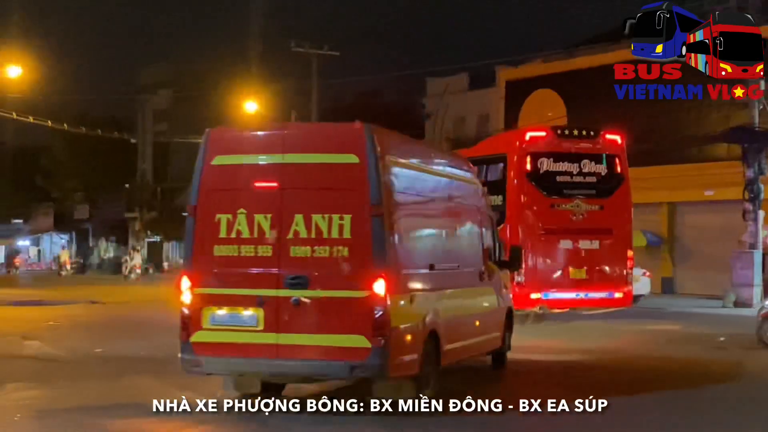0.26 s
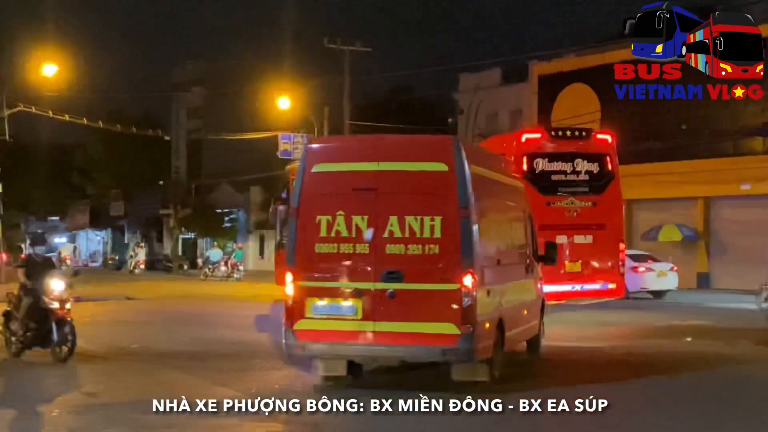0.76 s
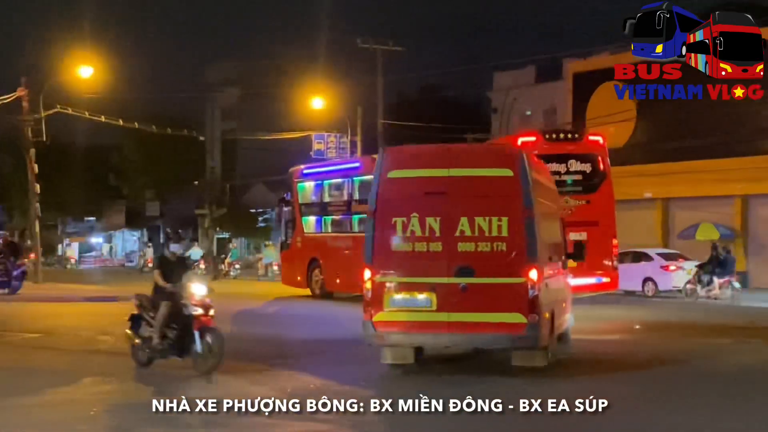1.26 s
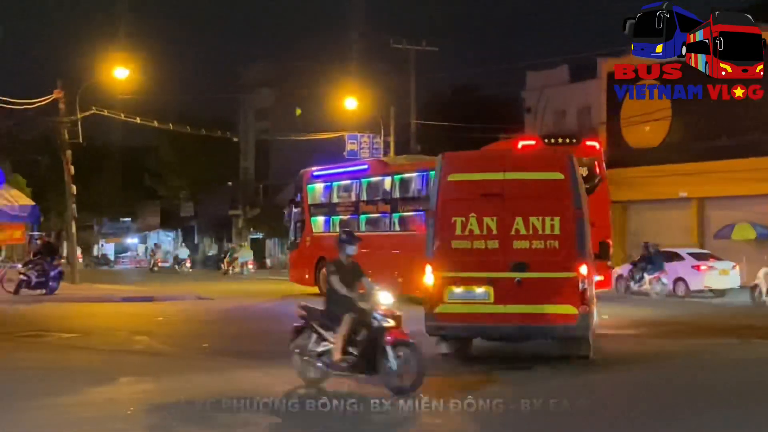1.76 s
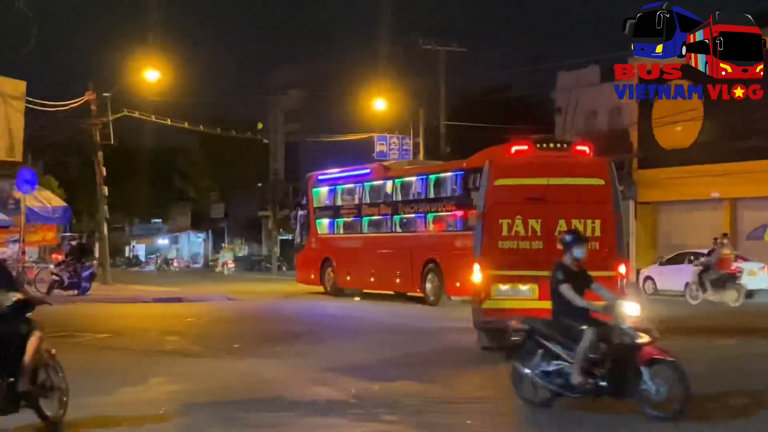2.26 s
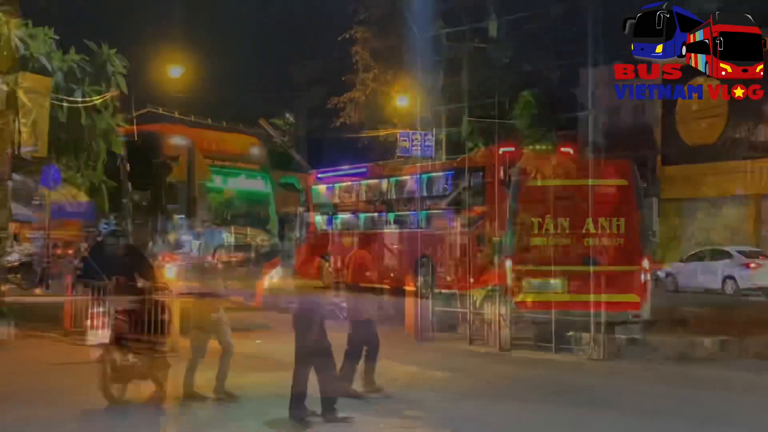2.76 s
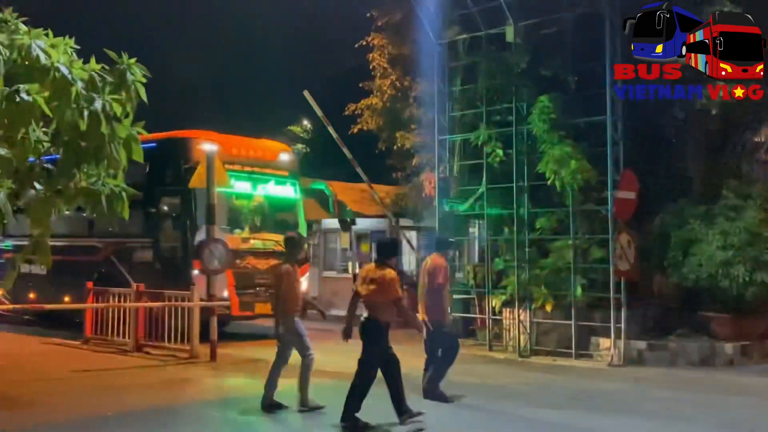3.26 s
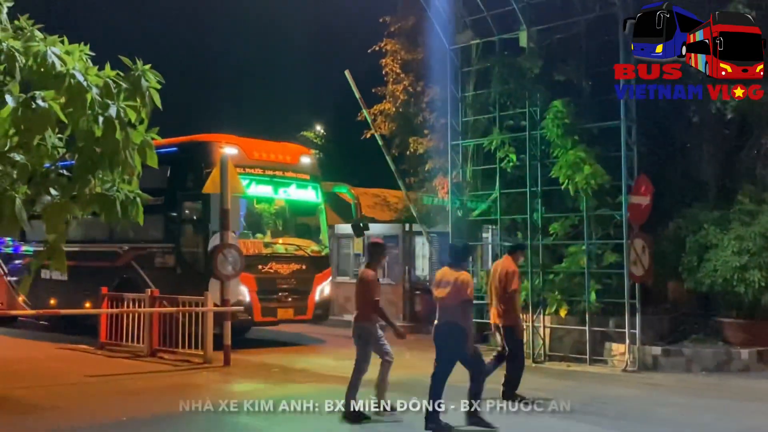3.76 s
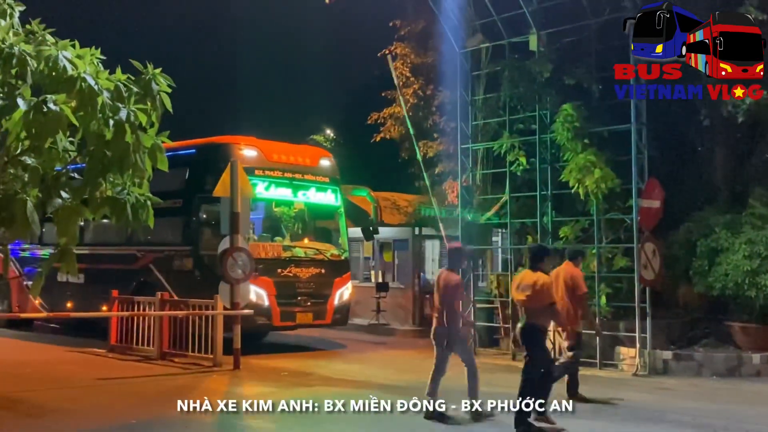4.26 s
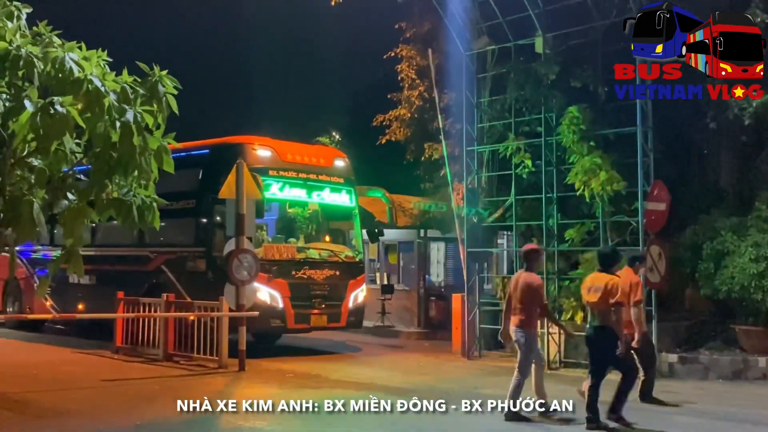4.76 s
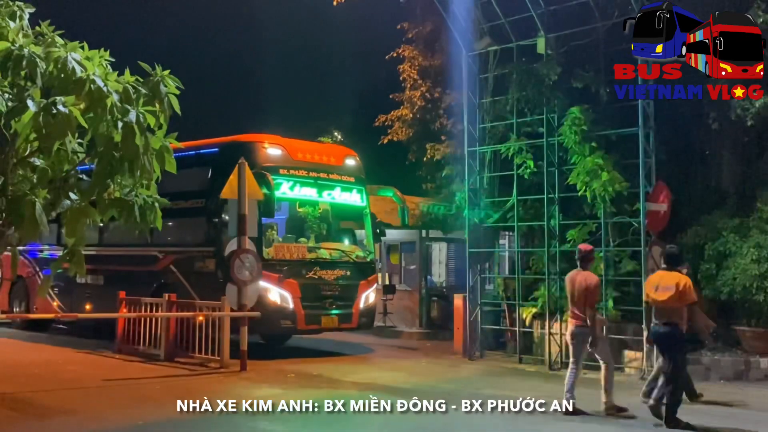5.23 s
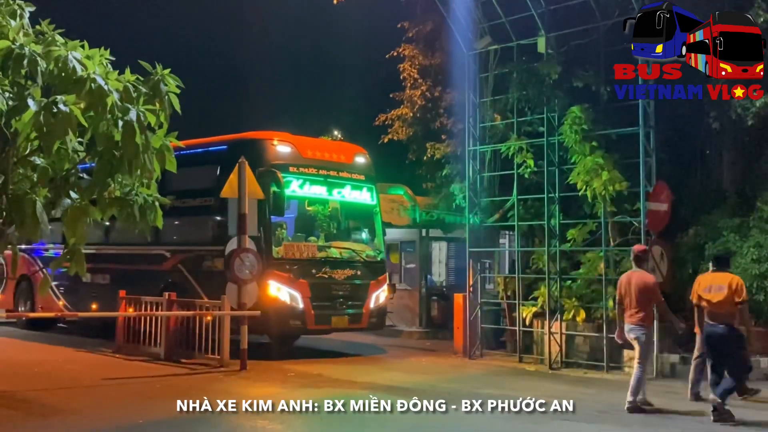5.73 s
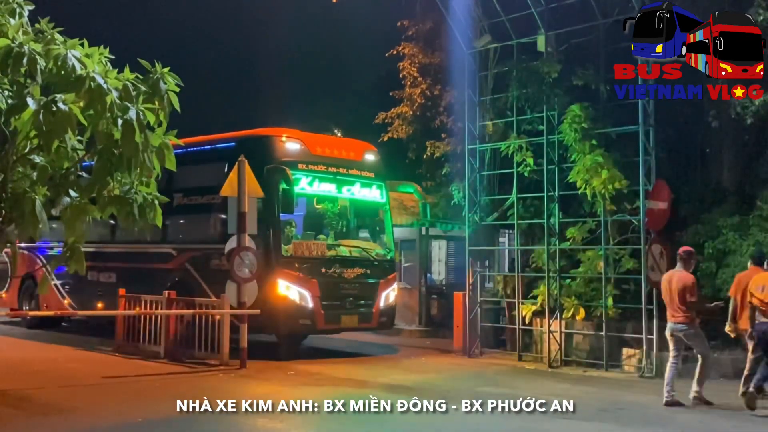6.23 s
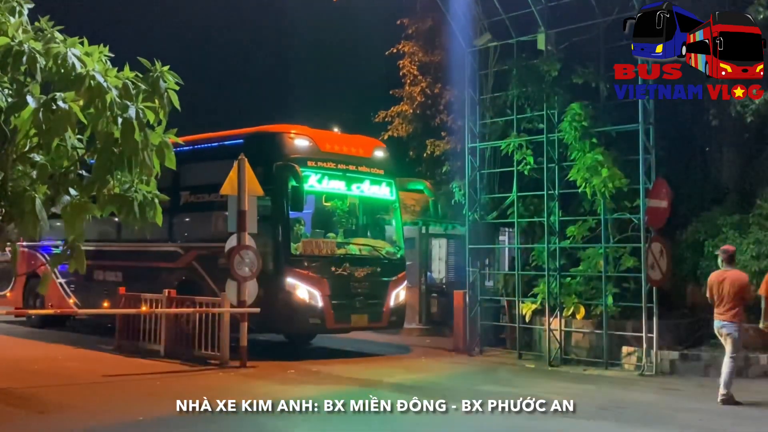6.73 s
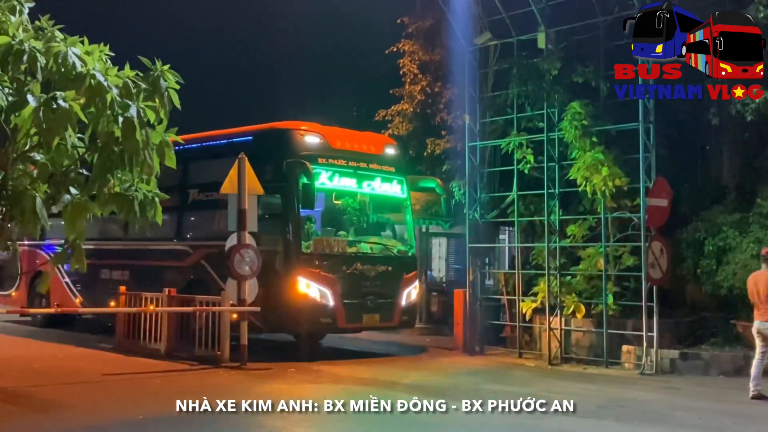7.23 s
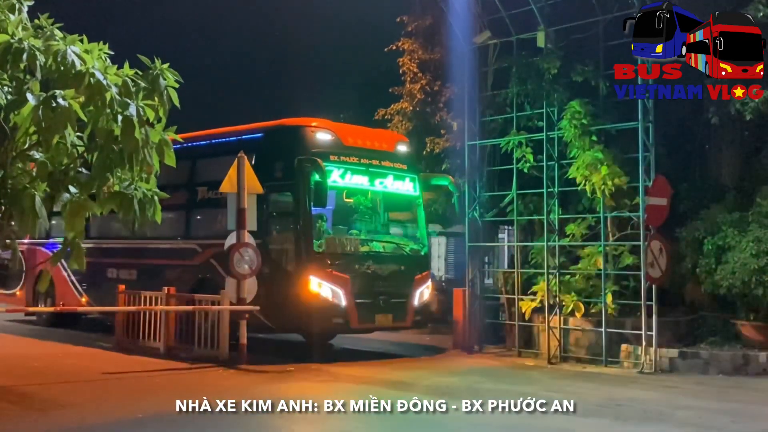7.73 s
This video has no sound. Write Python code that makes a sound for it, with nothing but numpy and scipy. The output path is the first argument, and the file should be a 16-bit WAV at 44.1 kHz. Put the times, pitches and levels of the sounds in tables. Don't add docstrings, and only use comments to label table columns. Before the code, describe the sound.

A night street by a bus station, heard through a phone's stereo microphones. From 0 to 2.4 seconds, a van, coach and motorbikes pull away: thick low diesel rumble, wavering exhaust hums, tyre roar, light valve clatter and airy hiss, with faint gear whines and brief belt squeaks. A small throttle lift comes near 1.2, and tiny sharp brake-air spits at about 1.8, 2.0 and 2.35. Between 2.4 and 3.3 the sound crossfades to the station gate, with a soft air leak around 3.2. A coach idles there, bass throbbing irregularly, the treble duller and quieter. A very faint wavering far beep passes around 5.3 to 5.5. From 7.1, distant horns give two quick, thin, high buzzing presses, the second near 7.4 and strongest around 7.5, then a slightly lower faint tone and blurred echoes linger until 8 as the engine continues.

```python
import sys
import numpy as np
from scipy import signal
from scipy.fft import rfft, irfft, next_fast_len
from scipy.io import wavfile
from scipy.ndimage import uniform_filter1d, map_coordinates

SR = 44100
rng = np.random.default_rng(int(sys.argv[2]) if len(sys.argv) > 2 else 0)


def ratio_of_db(decibels):
    return 10 ** (np.asarray(decibels, float) / 20)


def digitize_waveform(pressure):
    field = np.atleast_2d(pressure).T
    bounded = np.clip(field, -1, 1)
    quanta = np.round(bounded * 32767).astype(np.int16)
    wavfile.write(sys.argv[1], SR, quanta)


N = 352359

POINTED = np.array([[1.25], [.4]])


def seconds():
    return np.arange(N) / SR


def unit(x):
    return x / np.sqrt(np.mean(x ** 2) + 1e-20)


def along(points, hz):
    f, v = np.transpose(points)
    return np.interp(np.log(hz + 1), np.log(f + 1), v)


def curves(rows):
    s, *columns = np.transpose(rows)
    return [np.interp(seconds(), s, column) for column in columns]


def wobble(rate):
    knots = rng.standard_normal(int(N * rate / SR) + 4)
    return map_coordinates(knots, [np.arange(N) * rate / SR])


def filtered(x, response):
    m = next_fast_len(N + 8192)
    return irfft(rfft(x, m) * response(np.fft.rfftfreq(m, 1 / SR)), m)[..., :N]


def swells(rows):
    t = seconds()
    lift = np.zeros(N)
    for s, db, rise, fall in rows:
        before = np.clip(1 + (t - s) / rise, 0, 1)
        after = np.exp(-np.abs(t - s) / fall)
        lift += db * np.where(t < s, before, after)
    return lift


def tone(hz, db, drift, flutter_db, rate):
    turns = np.cumsum(hz * np.ones(N)) / SR
    pair = []
    for _ in range(2):
        size = np.sqrt(2) * ratio_of_db(db + flutter_db * wobble(rate))
        pair.append(size * np.sin(2 * np.pi * (turns + drift * wobble(rate))))
    return np.array(pair)


def held(notes, edge, drift, flutter_db, rate):
    out = np.zeros((2, N))
    for start, end, hz, end_hz, db in notes:
        a, b = max(int(start * SR), 0), min(int(end * SR), N)
        t = np.arange(b - a) / SR
        where = np.broadcast_arrays(np.arange(4)[:, None], 3 + t * rate)
        rough = map_coordinates(rng.standard_normal((4, 40)), where)
        glide = hz * t + (end_hz - hz) * t ** 2 / (2 * (end - start))
        turns = glide + drift * rough[:2] + rng.random((2, 1))
        soft = np.clip(np.minimum(t + (start <= 0), t[::-1]) / edge, 0, 1)
        size = np.sqrt(2) * soft * ratio_of_db(db + flutter_db * rough[2:])
        out[:, a:b] += size * np.sin(2 * np.pi * turns)
    return out


FADE_S = (2.41, 3.29)


def at_gate():
    return np.interp(seconds(), FADE_S, [0, 1])


# time in seconds, firing rate in Hz, level in dB.
NEAREST_DIESEL = [(0, 59.4, -22.5), (.62, 59.3, -28), (.8, 65.3, -25.5), (1.55, 64.15, -20.5),
                  (1.75, 59.4, -24.5), (2.38, 60.4, -26), (2.7, 64.2, -27), (3.36, 61.85, -37),
                  (4, 60.7, -28), (4.5, 66.04, -24), (4.8, 59.9, -33), (5.2, 60.3, -21.5), (5.5, 65.1, -25),
                  (5.9, 67.5, -25.5), (6.25, 60.46, -27), (6.7, 64.63, -21), (7.3, 66, -33),
                  (7.99, 62.2, -26.5)]
# start in seconds, end in seconds, start in Hz, end in Hz, level in dB.
EXHAUST_NOTES = [(0.0, 0.41, 161.8, 161, -34), (0.0, 0.47, 317.3, 311, -49),
                 (0.0, 0.77, 192.6, 199.4, -29.5), (0.05, 0.39, 256.5, 265.6, -41),
                 (0.33, 0.67, 114.2, 120, -35), (0.75, 1.27, 98.8, 98.4, -24),
                 (0.47, 0.79, 229.4, 231, -36), (0.57, 1.03, 317.2, 314, -37.5),
                 (0.59, 0.93, 262, 258.5, -35), (1.03, 1.35, 263.3, 249, -35),
                 (1.05, 1.33, 127, 137.4, -26.5), (1.05, 1.83, 114.4, 119.3, -27.5),
                 (1.23, 1.63, 97.5, 100, -26), (1.31, 1.63, 131.4, 130, -32),
                 (1.31, 1.65, 164.2, 162.2, -30.5), (1.55, 2.07, 143.6, 142.1, -27),
                 (1.86, 2.3, 125, 119.8, -27.5), (2.01, 2.35, 203.7, 207.6, -34),
                 (2.05, 2.49, 217.3, 214, -35), (2.27, 2.91, 96.9, 95.4, -29),
                 (2.29, 2.67, 284.2, 291, -38),
                 (2.73, 3.034, 201.3, 201.8, -35), (2.792, 3.09, 64, 61.0, -29),
                 (2.992, 3.41, 65.6, 58.5, -31), (3.174, 3.488, 299, 306, -41),
                 (3.33, 3.689, 65.7, 60.9, -31), (3.351, 3.65, 267, 269, -38.5),
                 (3.51, 4.17, 176.3, 176.5, -32), (3.871, 4.19, 72.3, 73.6, -34),
                 (3.872, 4.33, 57.5, 62.55, -32), (3.931, 4.493, 220.3, 214.6, -35.5),
                 (3.949, 4.25, 85.4, 88.6, -32), (4.055, 4.37, 290, 288, -45),
                 (4.588, 4.89, 315, 321.5, -46.5), (4.649, 4.973, 89.3, 90.8, -31),
                 (4.729, 5.05, 200, 201, -34.5), (5.27, 5.615, 163.7, 164.4, -34),
                 (5.63, 5.97, 169.2, 168, -39), (5.688, 6.01, 72.6, 73.8, -28),
                 (5.81, 6.171, 97, 101.3, -30), (5.887, 6.21, 147.6, 144, -41),
                 (5.93, 6.25, 153.5, 160.6, -37), (6.386, 6.688, 259.7, 260, -39),
                 (6.47, 6.809, 206.2, 195, -35.5), (6.511, 6.89, 240.4, 248, -39),
                 (7.009, 7.35, 100.5, 95.9, -30), (7.109, 7.91, 83.65, 81.6, -27.5),
                 (7.31, 7.62, 175.8, 170.6, -34.5), (7.307, 7.63, 220.8, 227, -39),
                 (7.471, 7.77, 296, 295, -46), (7.49, 7.911, 144.3, 155.4, -39),
                 (7.51, 7.81, 317, 312, -48), (7.613, 7.992, 42.8, 43.4, -28),
                 (0.2, .85, 130, 138, -26.5), (3, 3.6, 82, 92, -26), (3.05, 3.5, 150, 175, -29),
                     (2.5, 2.75, 138, 148, -28.5), (5, 5.6, 78, 75.7, -28), (0, .3, 100, 104, -30),
                     (1.2, 1.6, 305, 320, -31.5), (1.35, 1.55, 235, 230, -31), (6.5, 6.62, 76, 108, -27.5),
                     (1.98, 2.15, 335, 340, -32), (4.5, 4.5, 370, 380, -37)]
WHINES = [(0, .35, 830, 850, -47), (1.47, 1.72, 850, 890, -40), (2, 2.3, 940, 910, -42),
          (3.38, 3.56, 875, 858, -39), (3.05, 3.35, 1565, 1520, -42), (3.95, 4.35, 1500, 1530, -44.5),
          (4.6, 4.72, 1250, 1300, -49), (4.97, 5.09, 1350, 1340, -43), (5.3, 5.5, 1100, 1170, -44),
          (5.98, 6.12, 1060, 1080, -46.5), (6.75, 6.92, 1420, 1420, -44), (5.42, 5.62, 700, 690, -43),
          (3.7, 3.82, 1450, 1440, -42), (3.44, 3.56, 1290, 1290, -42), (5.62, 5.7, 1100, 1060, -46),
          (1.3, 1.42, 1950, 2100, -48)]
SQUEAKS = [(4.02, 4.12, 1040, 1200, -49), (5.02, 5.1, 1580, 1400, -45), (3.3, 3.44, 1745, 1735, -51),
           (4.58, 4.67, 1770, 1760, -49), (4.78, 4.86, 1450, 1480, -47), (4.91, 4.96, 1250, 1020, -44),
           (5.2, 5.27, 1500, 1600, -47), (5.04, 5.08, 1150, 1100, -46), (.45, .54, 1580, 1480, -45),
           (1.22, 1.27, 1480, 1450, -44), (1.45, 1.55, 2400, 2200, -46), (2.19, 2.27, 2400, 2140, -48),
           (.12, .22, 2200, 2100, -46), (.52, .63, 2050, 1960, -47), (1.75, 1.83, 2220, 2250, -47),
           (5.12, 5.17, 1850, 2600, -46.5), (6.5, 5.34, 1560, 1600, -45), (5.47, 5.52, 2100, 1600, -46),
           (5.63, 5.73, 1240, 1260, -49.5), (4.9, 5, 2300, 1800, -55), (5.34, 5.42, 1130, 920, -44),
           (5.49, 5.52, 1700, 2000, -46), (4.66, 4.72, 1700, 1660, -52), (4.54, 4.63, 1260, 1220, -43.5),
           (3.63, 3.73, 706, 706, -43.5), (2.14, 2.24, 780, 1100, -44), (6.2, 6.9, 1340, 1336, -51),
           (7.67, 7.77, 1441, 1000, -46), (7.2, 7.3, 960, 948, -51), (2.32, 2.4, 2250, 2200, -50),
           (.05, 0.143, 624, 620, -42)]


def engines():
    idle = ratio_of_db(-2.5) * tone(*curves(NEAREST_DIESEL), drift=.2, flutter_db=2.5, rate=20)
    exhaust_rows = EXHAUST_NOTES
    exhausts = ratio_of_db(-1.5) * held(exhaust_rows, .08, drift=.15, flutter_db=3.5, rate=22)
    whines = held(WHINES, .05, drift=.17, flutter_db=2.5, rate=35)
    squeaks = ratio_of_db(2.5) * POINTED * held(SQUEAKS, .02, drift=.08, flutter_db=1.8, rate=40)
    return idle + exhausts + whines + squeaks


def rush(junction, gate, patchy_db):
    z = signal.stft(rng.standard_normal((2, N)), nperseg=512)[2]
    patches = uniform_filter1d(rng.standard_normal(z.shape[1:]), size=6, axis=0)
    patches = unit(uniform_filter1d(patches, size=14, axis=1))
    pair = signal.istft(z * ratio_of_db(patchy_db * patches), nperseg=512)[1][:, :N]
    here = unit(filtered(pair, lambda hz: ratio_of_db(along(junction, hz))))
    there = unit(filtered(pair, lambda hz: ratio_of_db(along(gate, hz))))
    return here + at_gate() * (there - here)


# frequency in Hz, level in dB per Hz.
RUMBLE_COLOURS = [
    [(13, -60), (22, -33), (35, -8), (54, -1.5), (141, 1.5), (285, -9.5), (318, -6.5), (400, -11), (520, -17), (880, -120)],
    [(13, -60), (22, -17), (44, -8.5), (65, 1.5), (123, -5.5), (161, -6), (306, -17), (400, -18.5), (520, -58), (880, -120)],
]
ROAR_COLOURS = [
    [(150, -12.5), (250, -3.5), (323, -8), (519, -11), (625, -9), (744, -14), (906, -10.5), (1200, -17), (1470, -16), (2090, -16.5), (4000, -26.5), (5200, -55), (8800, -120)],
    [(150, -39), (250, -7), (362, -1), (393, -4), (421, -3), (531, -3.5), (625, -10.5), (718, -8), (798, -10.5), (1510, -11), (1680, -15), (2370, -18.5), (4000, -28), (5200, -36.5), (8800, -120)],
]
CLATTER_COLOUR = [(2500, -8), (3500, -5), (5000, 0), (7000, -4.5), (8000, -6), (9200, -24)]
AIR_COLOURS = [
    [(6500, -30), (8000, -2), (9500, 0), (11000, -3), (13300, -8.5), (14200, -11.5), (15500, -12), (15800, -40), (15950, -120)],
    [(6500, -30), (8000, -1), (9500, 0), (11000, -2.5), (12800, -8.5), (13500, -9), (14400, -9.5), (14800, -13), (15600, -12.5), (15800, -40), (15950, -120)],
]
# time in seconds, closeness in dB.
CLOSENESS = [(0, 1), (.04, 0.5), (.6, -.5), (1.3, 0), (1.9, 0), (2.45, -1), (2.6, -1.5), (3.0, -1.5),
             (3.27, 1.5), (3.7, 1.1), (4.15, 0), (4.6, -0.05), (5.4, 0.4), (6.0, -0.3), (6.6, -1),
             (7.4, -0.94), (7.96, 0), (7.99, 2)]
# junction in dB, gate in dB, growth in dB per dB of closeness.
LAYERS = [
    (-17.5, -20, 1),
    (-28, -30.5, 1.42),
    (-46.5, -53, 1.2),
    (-56.5, -62.5, 1.4),
]
# time in seconds, lift in dB, rise in seconds, fall in
# seconds.
THROTTLE_BLIPS = [(1.2, 3.5, 0.011, 0.32), (2.1, 2.5, 0.041, 0.1), (7.1, 2.5, 0.0097, 0.037),
                  (2.62, 2, .2, .25), (2.43, -1.5, .04, .04)]
# time in seconds, lift in dB,
# rise in seconds, fall in seconds.
AIR_LEAKS = [(2.12, 3, .04, .08), (2.46, 5, 0.058, .04), (3.15, 5, .05, .25), (3.45, 2, 0.049, 0.055),
             (4.55, 4, 0.038, 0.08), (7.21, 4.5, 0.059, .04), (7.5, -2, .04, 0.039)]


def traffic():
    near_db, = curves(CLOSENESS)
    levels = [here + at_gate() * (there - here) + grows * near_db for here, there, grows in LAYERS]
    rumble_db, roar_db, clatter_db, air_db = levels
    blips_db = swells(THROTTLE_BLIPS)
    turns = np.cumsum(curves(NEAREST_DIESEL)[0]) / SR
    beat = np.cos(2 * np.pi * turns) + 0.9 * np.cos(np.pi * turns)
    rumble = ratio_of_db(rumble_db - 4.0) * rush(*RUMBLE_COLOURS, patchy_db=-1.03)
    roar = ratio_of_db(roar_db + 0.27 * beat) * rush(*ROAR_COLOURS, patchy_db=0.68)
    clatter_db = clatter_db + blips_db + 3 + 0.75 * beat + 0.38 * wobble(25)
    clatter = ratio_of_db(clatter_db) * rush(CLATTER_COLOUR, CLATTER_COLOUR, patchy_db=1.0)
    air_db = air_db + 0.8 * blips_db + swells(AIR_LEAKS) + 7 + 0.49 * beat + 0.56 * wobble(30)
    air = ratio_of_db(air_db) * rush(*AIR_COLOURS, patchy_db=0.5)
    return rumble + roar + clatter + air


# time in seconds, change in dB.
THROBS = [(.089, 1.5), (.3, -4), (.471, 2), (.56, -2), (.958, 1.5), (1.504, 1.5), (1.81, -4.5), (1.921, 3),
          (2.102, 1.5), (2.32, -2), (2.425, 3), (3.06, -3.5), (3.294, 2.5), (3.37, 2.5), (3.49, 1.5),
          (4.003, 2.5), (4.439, 2.5), (4.581, 3.5), (4.866, 1.5), (4.95, -3.5), (5.119, 2), (5.43, -2.5),
          (5.655, 2), (5.749, 1.5), (5.926, 2), (6.143, 3), (6.23, -3), (6.34, -3.5), (6.42, 3), (6.664, 2),
          (7.117, 2), (7.271, 1.5), (7.417, 2), (7.71, 2), (7.842, 2)]


def throbbing(pair):
    t = seconds()
    bass_top_hz, half_width_s, steady = 190, .035, .65
    bass = filtered(pair, lambda hz: 1 / (1 + (hz / bass_top_hz) ** 8))
    quick = uniform_filter1d(uniform_filter1d(bass[0] ** 2, size=2200), size=2200)
    slow = uniform_filter1d(uniform_filter1d(quick, size=20000), size=20000)
    throb_db = sum(db * np.exp(-((t - s) / half_width_s) ** 2) for s, db in THROBS)
    gain = np.abs(slow / quick) ** (steady / 2) * ratio_of_db(1.06 * throb_db - 0.52)
    return pair + bass * (gain - 1)


def pressed(beeps, t60):
    t = seconds()
    gain = np.zeros(N)
    for s, length, db, attack in beeps:
        echo_db = -60 * np.maximum(t - s - length, 0) / t60
        gain += ratio_of_db(db + echo_db) * np.clip((t - s) / attack, 0, 1)
    return gain


def beating(rows):
    t = seconds()
    return sum(ratio_of_db(db) * np.exp(-((t - s) / half) ** 2) for s, db, half in rows)


# time in seconds, level in dB, half-width in seconds.
SIXTH_SWELLS = [(7.125, -53, .025), (7.225, -44, 0.044), (7.12, -51, .02), (7.3, -50, 0.036),
                (7.445, -44, 0.031), (7.51, -41, 0.033), (7.6, -52, .03)]
SEVENTH_SWELLS = [(7.12, -45, 0.03), (7.18, -40, .04), (7.25, -37, 0.019), (7.29, -45, .02),
                  (7.33, -40.5, 0.025), (7.445, -39, 0.026), (7.51, -32, 0.034), (7.575, -39, 0.027),
                  (7.615, -40, 0.012), (7.66, -45, .03), (7.39, -54, .04)]
EIGHTH_SWELLS = [(7.14, -37.5, 0.027), (7.17, -53, .02), (7.2, -47, 0.028), (7.235, -49, .02),
                 (7.555, -50, .02), (7.63, -50, .02), (7.27, -38.5, .028), (7.37, -44, 0.01),
                 (7.41, -39, 0.015), (7.455, -39, 0.03), (7.52, -34, .022), (7.585, -39, 0.018),
                 (7.71, -45, 0.032)]
SECOND_SWELLS = [(7.5, -48, .06), (7.68, -47, 0.026), (7.75, -41, 0.023), (7.8, -47, .022),
                 (7.89, -49, 0.021), (7.945, -44, 0.024), (7.985, -47, 0.022)]
# partial number, level in dB relative to the seventh.
FOLLOWING_PARTIALS = [(9, -24), (19, -32), (20, -21), (21, -31), (32, -42)]
# start in seconds, length in seconds, level in dB, attack in seconds.
TWIN_BEEPS = [
    (7.105, .2, -53, .006),
    (7.4, .19, -54, .03),
]
SECOND_HORN_HZ = [2810, 2786]
# centre in Hz, half-width in Hz, swells (rows as above).
BLURRED = [
    (3540, 95, [(7.655, -50, .03), (7.745, -45, .028), (7.79, -51, .025), (7.9, -53, .02), (7.955, -44, .02)]),
    (4020, 150, [(7.71, -52, .025), (7.78, -53, .02), (7.95, -52, .03)]),
    (2820, 110, [(7.56, -51, .06), (7.7, -48, .05), (7.76, -47, .03), (7.81, -49, .03), (7.92, -46.5, .06)]),
    (3300, 750, [(7.22, -48, .1), (7.5, -45, .1), (7.74, -45.5, .1), (7.95, -45.5, .06)]),
    (1750, 400, [(4.65, -47, .12), (5.1, -46, .15), (5.5, -46, .15)]),
]
# start in seconds, end in seconds, start in Hz, end in Hz, level in dB.
FAR_BEEP = [(5.32, 5.39, 1850, 1780, -41.5), (5.38, 5.45, 1765, 1800, -42.5), (5.41, 5.47, 1400, 1360, -43),
            (5.42, 5.52, 1060, 1040, -44), (5.32, 5.4, 720, 705, -42), (5.43, 5.52, 715, 720, -43)]


def horns():
    first_hz, twin_hz, first_start_s = 479.8, 472.4, 7.103

    def partial(k, db):
        return tone(k * first_hz, db, drift=.09, flutter_db=1.4, rate=70)

    seventh = partial(7, 0) + sum(partial(k, db) for k, db in FOLLOWING_PARTIALS)
    first = beating(SIXTH_SWELLS) * partial(6, 0)
    first = first + beating(SEVENTH_SWELLS) * seventh + beating(EIGHTH_SWELLS) * partial(8, 0)
    first = first * np.clip((seconds() - first_start_s) / .006, 0, 1)
    twin = tone(7 * twin_hz, 0, drift=.12, flutter_db=3, rate=40)
    twin = twin + tone(8 * twin_hz, -7, drift=.12, flutter_db=3, rate=40)
    twin = pressed(TWIN_BEEPS, t60=0.32) * twin
    second = sum(tone(hz, db, drift=.1, flutter_db=2, rate=70) for hz, db in zip(SECOND_HORN_HZ, [0, -5]))
    second = beating(SECOND_SWELLS) * second
    blurred = np.zeros((2, N))
    for hz, half, rows in BLURRED:
        noise = filtered(rng.standard_normal((2, N)), lambda f: np.exp(-((f - hz) / half) ** 2))
        blurred += beating(rows) * unit(noise)
    far_beep = POINTED * held(FAR_BEEP, .02, drift=.08, flutter_db=1.5, rate=35)
    return first + twin + second + blurred + far_beep


SPIT_TIMES = [1.957, 1.968, 2.336, 1.818, 2.359]
# level in dB, time to fall by 60 dB in seconds, rise in seconds.
SPIT_SHAPES = [(-31.5, .05, .01), (-33, .022, .004), (-28.5, .05, .003), (-35, .006, .002),
               (-38, .04, .008)]
# frequency in Hz, level in dB per Hz.
SPIT_COLOUR = [(2500, -22), (5000, 3), (7000, 1.5), (11000, -1), (15000, -5), (15600, -60), (15900, -120)]


def spits():
    t = seconds()
    shape = np.zeros(N)
    for s, (db, t60, rise) in zip(SPIT_TIMES, SPIT_SHAPES):
        fall_db = -60 * np.maximum(t - s, 0) / t60
        shape += ratio_of_db(db + fall_db) * np.clip((t - s) / rise + 1, 0, 1)
    return filtered(shape * rng.standard_normal((2, N)), lambda hz: ratio_of_db(along(SPIT_COLOUR, hz)))


# frequency in Hz, likeness.
TREBLE_LIKENESS = [(8600, .78), (10500, .9), (12000, .93)]


def ports(pair, alike, lead):
    treble_hz, delay_from_hz, gap_s = 7800, 6900, .00029

    def response(hz):
        likeness = np.where(hz > treble_hz, along(TREBLE_LIKENESS, hz), np.clip(along(alike, hz), -1, 1))
        turn = np.arccos(likeness) / 2
        phase = along(lead, hz) - 2 * np.pi * gap_s * np.maximum(hz - delay_from_hz, 0)
        half = np.exp(.5j * phase)
        left = [np.cos(turn) * half, np.sin(turn) * half]
        right = [np.cos(turn) / half, -np.sin(turn) / half]
        return np.array([left, right])

    return filtered(pair, response).sum(axis=1)


# frequency in Hz, likeness from 0 to 1.
LIKENESS = [
    [(30, 0.99), (60, 1), (290, 0.91), (640, 0.77), (1400, 0.38), (2000, 0.55), (2150, 0.93), (2600, 0.87), (3500, 0.8), (4200, 1), (7000, 1)],
    [(30, 1), (60, 0.99), (260, 0.97), (600, 0.45), (1100, 0.063), (1600, 0.16), (2500, 0.5), (4500, 1), (5600, 0.17), (6600, 1), (7800, 0.36)],
]
# frequency in Hz, lead in radians.
LEFT_LEAD = [
    [(60, 0.16), (1400, -0.52), (2200, 0), (7000, 0.22), (8000, -0.15)],
    [(60, -0.07), (600, -0.86), (1600, -0.8), (2100, -0.75), (3000, 0.83), (5200, 0.99), (6800, -1.24), (8200, -0.19)],
]


def scene():
    pair = throbbing(traffic() + engines()) + horns() + spits()
    junction = ports(pair * (1 - at_gate()), LIKENESS[0], LEFT_LEAD[0])
    gate = ports(pair * at_gate(), LIKENESS[1], LEFT_LEAD[1])
    return junction + gate


def thinned(x, mid_db, side_db, faint_db, from_hz):
    hz, _, z = signal.stft([x[0] + x[1], x[0] - x[1]], SR, nperseg=1024)
    power = uniform_filter1d(uniform_filter1d(np.abs(z) ** 2, size=7, axis=1), size=3, axis=2)
    partner = power[::-1] * ratio_of_db([[[mid_db]], [[side_db]]]) ** 2
    need = np.maximum(partner, ratio_of_db(faint_db) ** 2)
    keep = (power > need) | (hz < from_hz)[:, None]
    mid, side = signal.istft(z * keep, SR, nperseg=1024)[1][:, :N] / 2
    return np.array([mid + side, mid - side])


def roll_off(x):
    return signal.sosfilt(signal.butter(12, 15800, fs=SR, output="sos"), x)


def record(dry):
    faint_db = [[[-82.3]], [[-80.2]]]
    mix = thinned(dry, mid_db=-7.3, side_db=-7.5, faint_db=faint_db, from_hz=1800)
    return roll_off(mix)


dry = scene()
out = record(dry)
digitize_waveform(out)
```